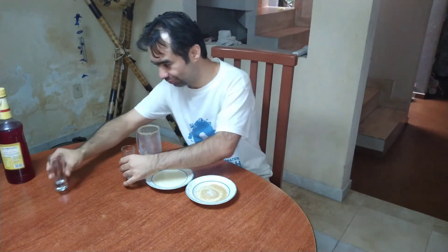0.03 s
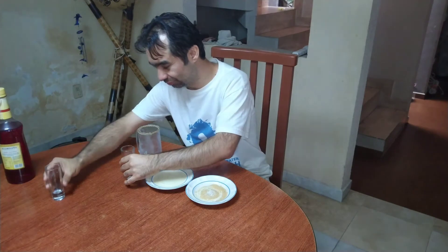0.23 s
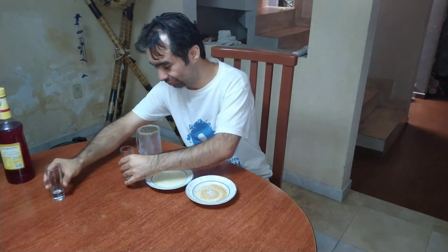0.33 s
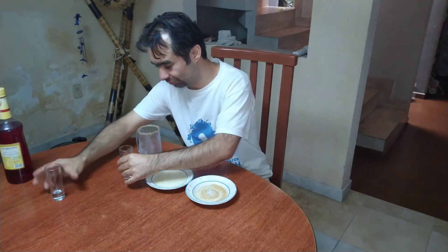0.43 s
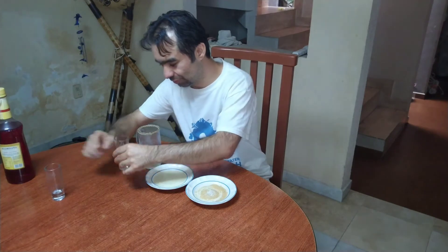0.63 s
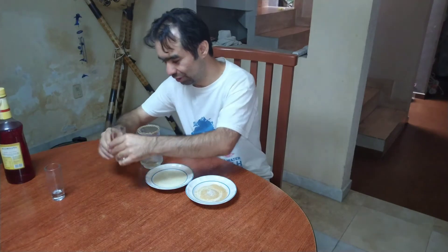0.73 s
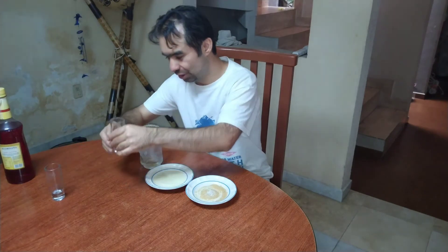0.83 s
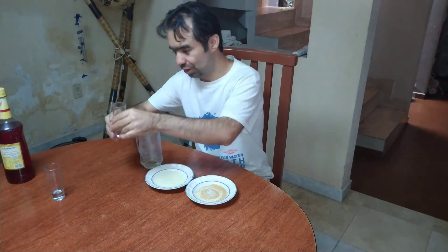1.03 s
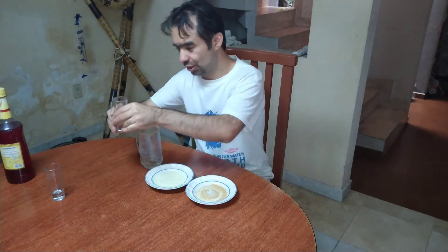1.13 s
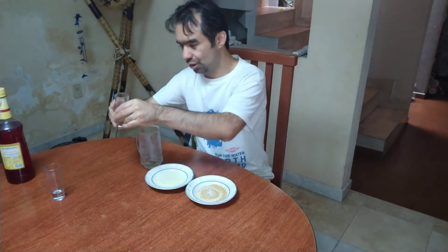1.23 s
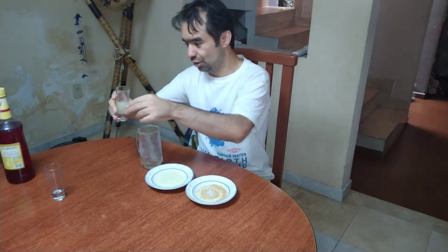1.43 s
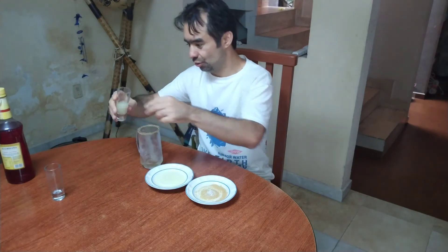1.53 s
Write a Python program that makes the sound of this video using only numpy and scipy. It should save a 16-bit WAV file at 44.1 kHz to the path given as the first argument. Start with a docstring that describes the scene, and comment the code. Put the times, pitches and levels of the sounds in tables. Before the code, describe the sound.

One sharp, hollow knock sounds as a small glass lands on a wooden dining table, dying quickly in the room. Afterwards a faint rustle of clothing continues as the arm draws back, over quiet background hiss.

```python
"""Faint rumble, hiss and sleeve rustle, then a shot glass knocks on a wooden dining table.
Its edge grazes the top and the base lands: a crack spreads through the board as a falling chirp,
the board's hollow modes ring, and a soft thud follows within the tail of the hard-walled room.
The sleeve rustles on as the arm draws back."""
import sys
import numpy as np
from scipy import signal
from scipy.io import wavfile

SR = 44100
rng = np.random.default_rng(int(sys.argv[2]) if len(sys.argv) > 2 else 0)


def to_wav(s):
    """Save 16-bit WAV."""
    ch = np.atleast_2d(s).T  # columns
    pcm = np.round(np.clip(ch, -1, 1) * 32767)  # PCM
    wavfile.write(sys.argv[1], SR, pcm.astype(np.int16))


N = 70560
T = np.arange(N) / SR

# noise spectra: f/Hz, relative density/dB
FLOOR_SPECTRUM = [(25, -4), (55, 4), (80, -1), (120, -2.5), (300, -6), (700, -19), (1500, -15),
                  (5000, -18.5), (9200, -19.5), (11500, -35), (16000, -39)]
RUB_SPECTRUM = [(100, -9), (300, 0.5), (600, -2.5), (1150, -1), (1600, -4), (2800, -1), (4500, -9),
                (7000, -11), (15000, -35)]
CLOTH_HISS_SPECTRUM = [(1500, -51), (4000, -7), (6000, -0.5), (8000, -0.5), (9500, -0.5), (11000, -5.5),
                       (15500, -11)]
TAIL_SPECTRUM = [(60, -40), (115, -22.5), (170, -4.5), (280, 1), (350, -8), (450, -2), (750, 0.5),
                 (1000, -1), (1400, -5), (2000, -7), (3200, -20), (5000, -26.5), (9000, -34), (12000, -68),
                 (16000, -66)]
# left-right likeness of the room's sound: f/Hz, correlation
STEREO_CORRELATION = [(40, 0.79), (170, 0.9), (330, 0.76), (600, 0.36), (1100, -0.21), (3000, 0.021),
                      (12000, -0.054)]
# sleeve envelopes, soft rub and high hiss: t/s, level/dB
RUB_ENVELOPE = [(0, -54), (.09, -65), (.21, -53), (.5, -55), (.59, -55.5), (.64, -50.5), (.7, -49),
                (.775, -46), (.83, -47.5), (.945, -57.5), (1.0, -48), (1.08, -53.5), (1.16, -48.5),
                (1.23, -48), (1.32, -49), (1.45, -55.5), (1.6, -50)]
CLOTH_HISS_ENVELOPE = [(0, -56.5), (.085, -68), (.15, -55), (.215, -50.5), (.35, -61.5), (.52, -55),
                       (.585, -54), (.635, -46.5), (.7, -47.5), (.78, -46), (.83, -50), (.945, -57.5),
                       (.99, -50.5), (1.06, -52.5), (1.22, -48.5), (1.41, -54), (1.6, -49)]
# glass contacts, edge then base: t/s, level/dB
GLASS_CONTACTS = [(0.2285, -24), (0.2413, 1.5)]
# modes of the table top, its crack and the thud: f/Hz, level/dB, t60/s
TABLE_MODES = [(154, -30, 0.23), (173.8, -22, 0.27), (189.3, -20.5, 0.37), (215.6, -22.5, 0.26),
               (238, -42, 0.36), (267.4, -24.5, 0.48), (301.3, -11, 0.178), (403.6, -21.5, 0.37),
               (419.6, -20.5, 0.55), (479, -16, 0.2), (582.5, -26, 0.44), (620, -9.5, 0.1),
               (659, -24, 0.49), (786, -22, 0.17), (804.4, -22, 0.47), (880, -28.5, 0.48), (917, -19, 0.36),
               (1115, -16, 0.21), (1215, -28, 0.53), (1365, -24, 0.41), (1447, -28.5, 0.27),
               (2200, -47, 0.33), (2892, -24.5, 0.1)]
CRACK_MODES = [(717, -20, 0.096), (1490, -10, 0.023), (2740, -12, .012), (3570, -17.5, 0.013),
               (8630, -31.5, 0.0028)]
THUD_MODES = [(286, -18, 0.082), (420, -10.5, 0.0089)]
# decay of the dense ring of table and room: f/Hz, t60/s
TAIL_DECAY = [(130, 0.35), (340, 0.58), (900, 0.5), (2400, 0.39), (6300, 0.26), (12000, .3)]

LEFT_LAG_S = .00022  # the right microphone hears the table first
BEND_DELAY_S = .000908  # 1 kHz behind 4 kHz


def from_db(db):
    """Decibels to gain."""
    return 10 ** (np.asarray(db) / 20)


def unit_rms(x):
    """Scale to rms 1."""
    return x / np.sqrt(np.mean(x ** 2) + 1e-20)


def at_hz(table, hz):
    """Interpolate on a log-frequency axis."""
    freqs_hz, values = np.transpose(table)
    return np.interp(np.log(hz), np.log(freqs_hz), values)


def noise_bands(spectrum):
    """Third-octave stereo noise, total rms 1: (centres_hz, bands)."""
    edges_hz = np.geomspace(22, 17000, 30)
    centres_hz = np.sqrt(edges_hz[1:] * edges_hz[:-1])
    white = rng.standard_normal((2, 2, N + SR // 2))
    bands = []
    for k, hz in enumerate(centres_hz):
        bandpass = signal.butter(2, edges_hz[k:k + 2], btype="band", fs=SR, output="sos")
        mid, side = signal.sosfilt(bandpass, white[k % 2])[:, -N:]
        correlation = np.clip(at_hz(STEREO_CORRELATION, hz), -.99, .99)
        stereo = np.sqrt(1 + correlation) * mid + np.sqrt(1 - correlation) * side * [[1], [-1]]
        bands.append(from_db(at_hz(spectrum, hz)) * stereo)
    bands = np.array(bands)
    return centres_hz, bands / bands.sum(0).std()


def room_floor(level_db=-52):
    """Steady low rumble and microphone hiss."""
    _, bands = noise_bands(FLOOR_SPECTRUM)
    return from_db(level_db) * bands.sum(0)


def drift(corner_hz):
    """Low-passed random wander, rms 1."""
    pole = np.exp(-2 * np.pi * corner_hz / SR)
    wander = signal.lfilter([1], [1, -2 * pole, pole * pole], rng.standard_normal(2 * N))
    return unit_rms(wander[N:])


def sleeve(envelope, spectrum, flicker_db, grain_db):
    """Sliding cloth: noise with flickering bands and a fine grain."""
    _, bands = noise_bands(spectrum)
    hiss = sum(band * from_db(flicker_db * drift(corner_hz=16.4)) for band in bands)
    grain = from_db(grain_db * drift(corner_hz=190))
    level_db = np.interp(T, *np.transpose(envelope))
    return unit_rms(hiss * grain) * from_db(level_db)


def since_arrival(start_s, hz):
    """Age in s of a bending wave: 4 kHz arrives at start_s, the bass later."""
    delay_s = BEND_DELAY_S * (np.sqrt(4000 / hz) - 1)
    return np.maximum(T - start_s - delay_s, 0)


def struck_modes(modes, contacts):
    """Each contact rings damped modes of alternating sign; the left side lags."""
    out = np.zeros((2, N))
    for start_s, contact_db in contacts:
        for k, (hz, mode_db, t60_s) in enumerate(modes):
            age_s = np.array([since_arrival(start_s + lag_s, hz) for lag_s in (LEFT_LAG_S, 0)])
            envelope = from_db(contact_db + mode_db - 60 * age_s / t60_s)
            out += (-1) ** k * envelope * np.sin(2 * np.pi * hz * age_s)
    return out


def room_tail(level_db=-14, build_s=.0018):
    """Dense table modes and room reflections build fast and die band by band."""
    out = np.zeros((2, N))
    for hz, band in zip(*noise_bands(TAIL_SPECTRUM)):
        for start_s, contact_db in GLASS_CONTACTS:
            age_s = since_arrival(start_s, hz)
            build = 1 - np.exp(-age_s / build_s)
            decay_db = 60 * age_s / at_hz(TAIL_DECAY, hz)
            out += band * build * from_db(level_db + contact_db - decay_db)
    return out


def bending_chirp(start_hz=5900, fall_s=.0027, peak_s=.002, level_db=-6, lead_s=.0004):
    """The stiff board carries treble fastest, so the landing arrives as a falling sweep."""
    start_s = GLASS_CONTACTS[-1][0] - lead_s
    age_s = np.maximum(T - start_s - np.array([[LEFT_LAG_S], [0]]), 0)
    swell = age_s / peak_s * np.exp((1 - (age_s / peak_s) ** 2) / 2)
    phase_rad = 2 * np.pi * start_hz * age_s / (1 + age_s / fall_s)
    return from_db(level_db) * swell * np.sin(phase_rad)


def thud(start_s=.3275):
    """Two low, fast-dying modes just after the landing."""
    return struck_modes(THUD_MODES, [(start_s, 0)])


def scene():
    """Noise floor, sleeve and knock, in stereo."""
    floor = room_floor()
    rub = sleeve(RUB_ENVELOPE, RUB_SPECTRUM, flicker_db=1.5, grain_db=.5)
    hiss = sleeve(CLOTH_HISS_ENVELOPE, CLOTH_HISS_SPECTRUM, flicker_db=1.72, grain_db=.2)
    board = struck_modes(TABLE_MODES + CRACK_MODES, GLASS_CONTACTS)
    knock = board + room_tail() + bending_chirp() + thud()
    return floor + rub + hiss + knock


def record(dry):
    """Microphone ports lift a narrow treble band; peaks are rounded, the top is cut."""
    port_hz, width_hz, boost_db, cutoff_hz = 9020, 1190, 9, 15800
    b, a = signal.iirpeak(port_hz, port_hz / width_hz, fs=SR)
    boosted = dry + (from_db(boost_db) - 1) * signal.lfilter(b, a, dry)
    rounded = boosted / (1 + boosted ** 6) ** (1 / 6)
    lowpass = signal.ellip(12, .2, 80, cutoff_hz, fs=SR, output="sos")
    return signal.sosfilt(lowpass, rounded)


dry = scene()
out = record(dry)
to_wav(out)
```